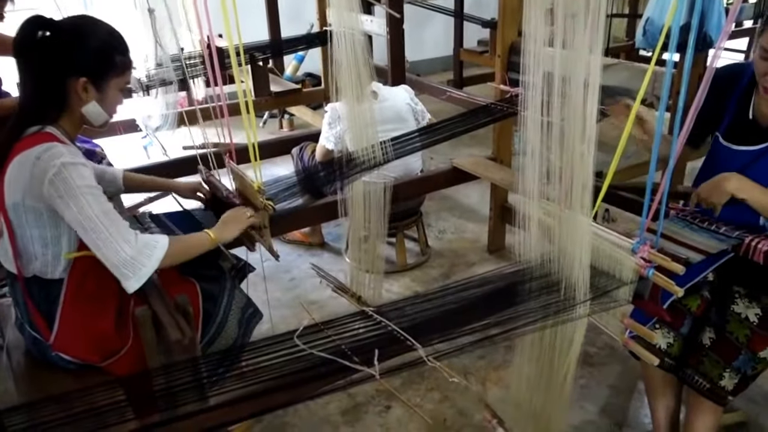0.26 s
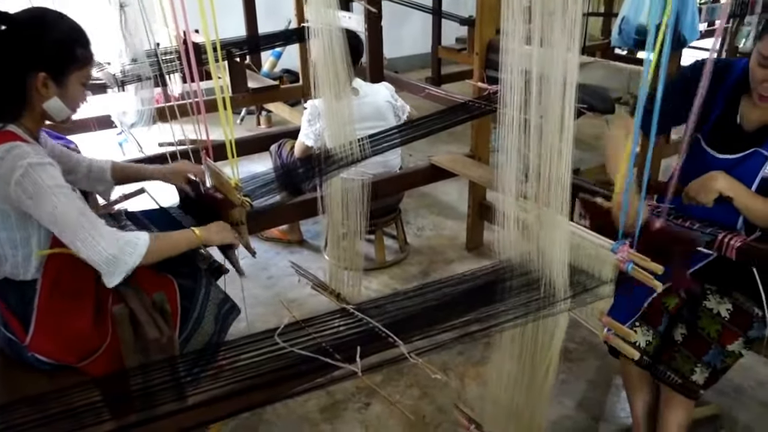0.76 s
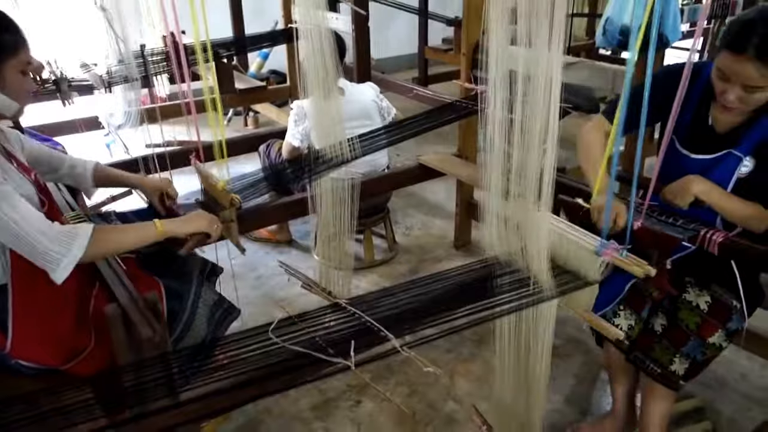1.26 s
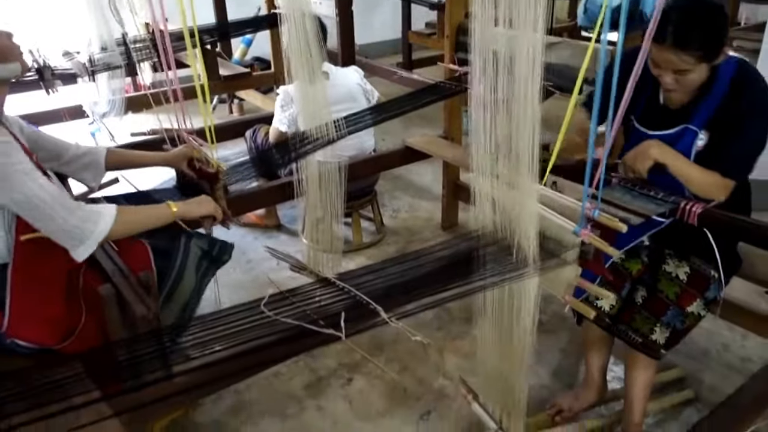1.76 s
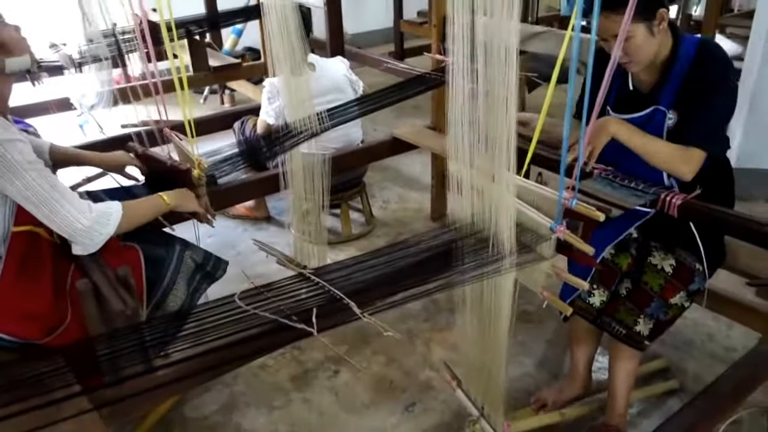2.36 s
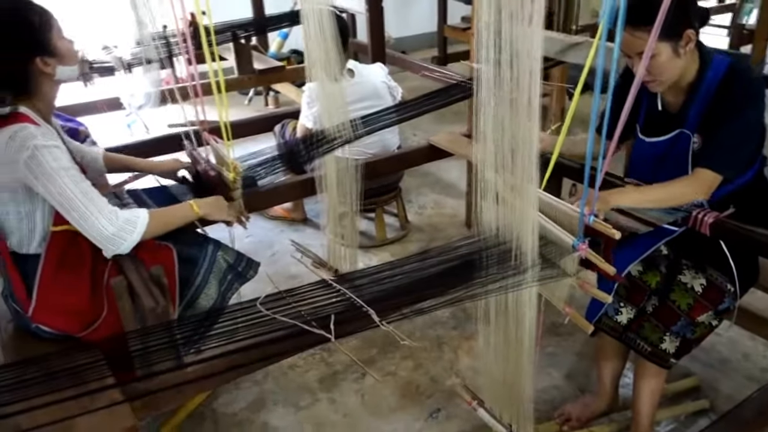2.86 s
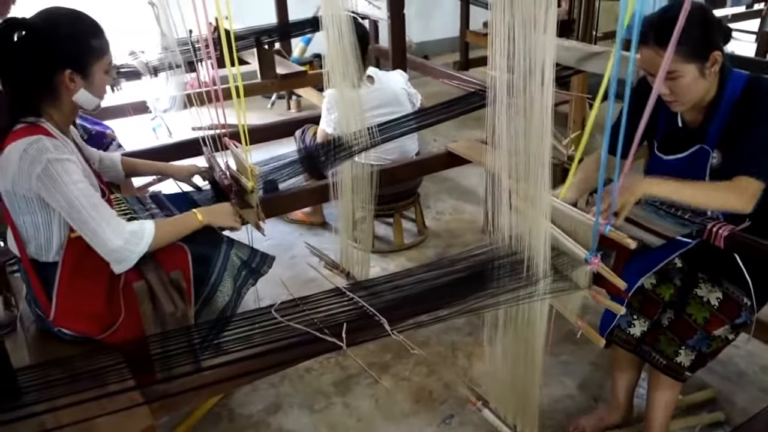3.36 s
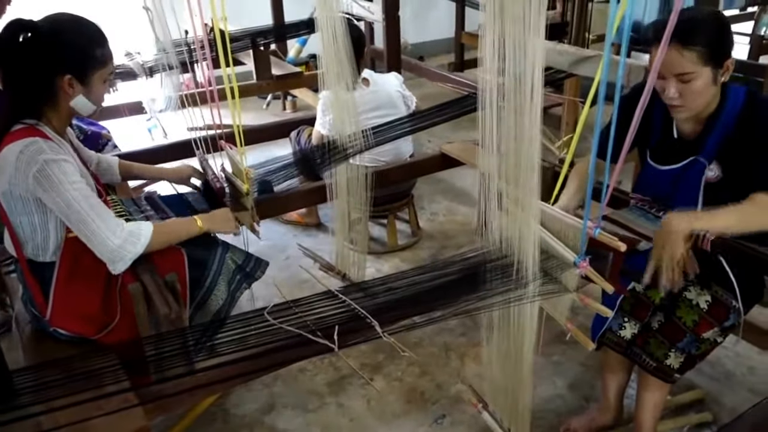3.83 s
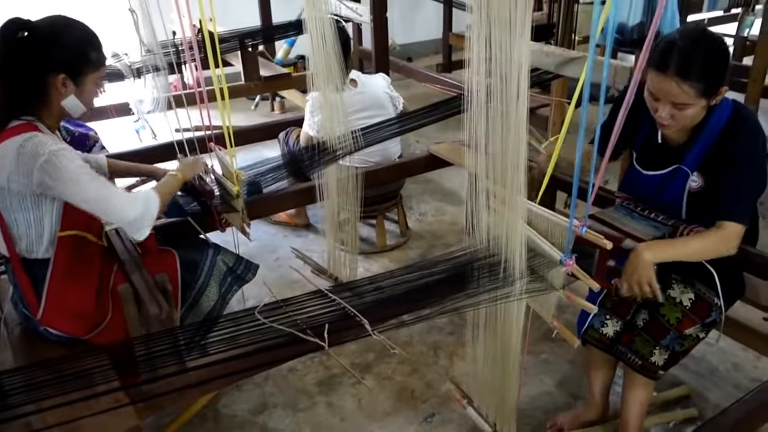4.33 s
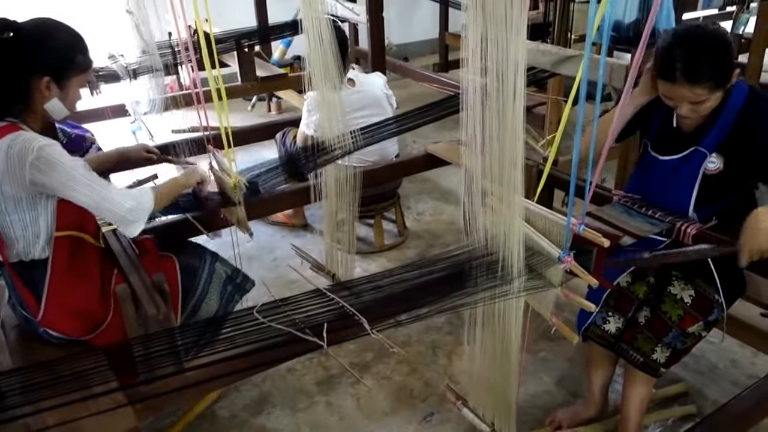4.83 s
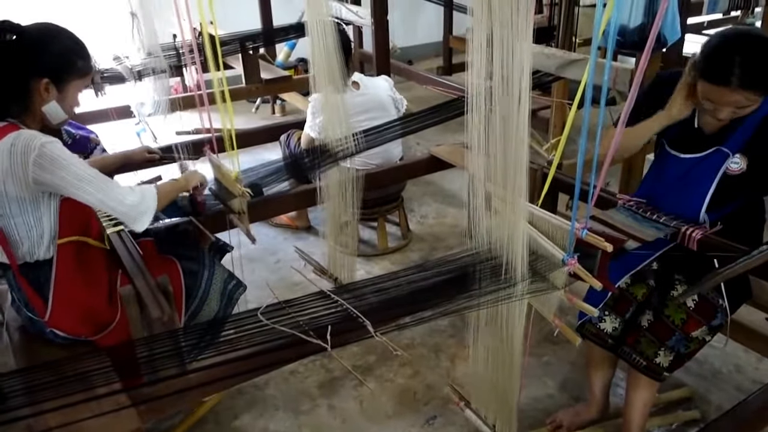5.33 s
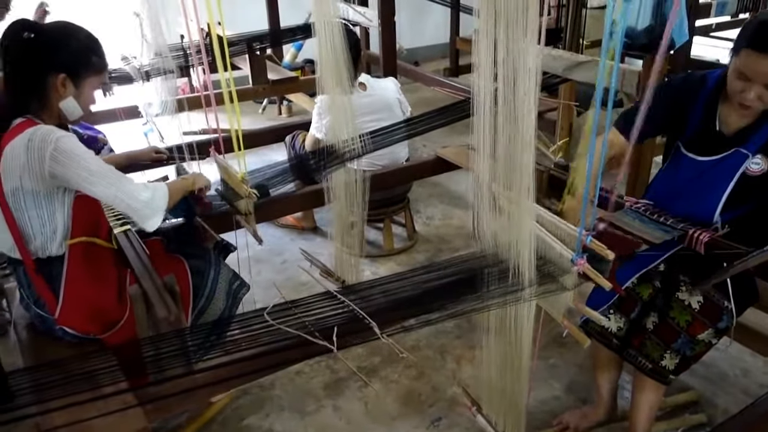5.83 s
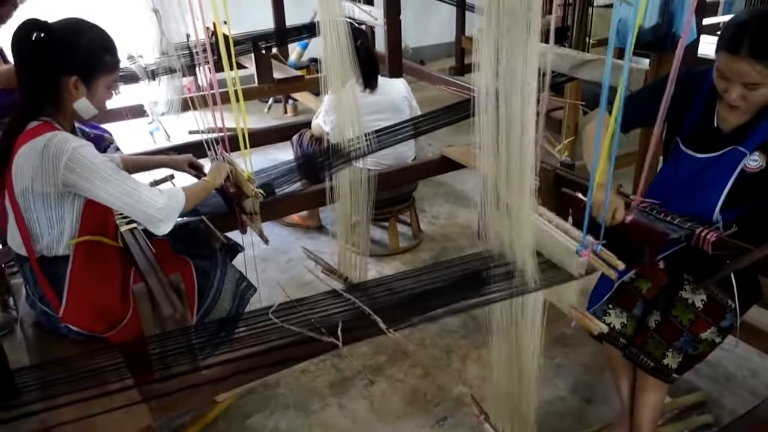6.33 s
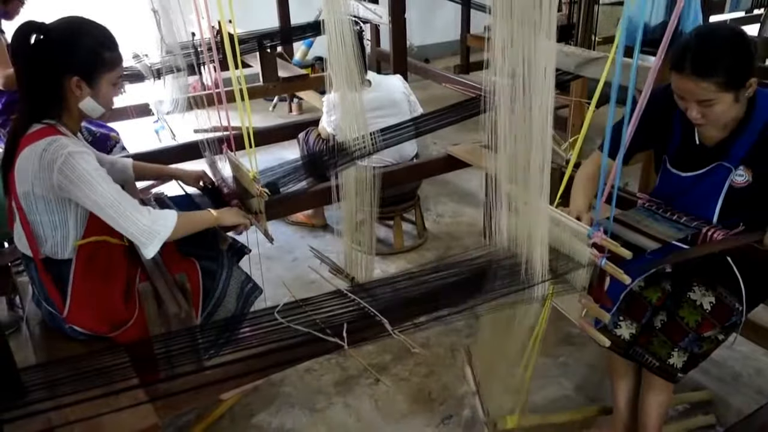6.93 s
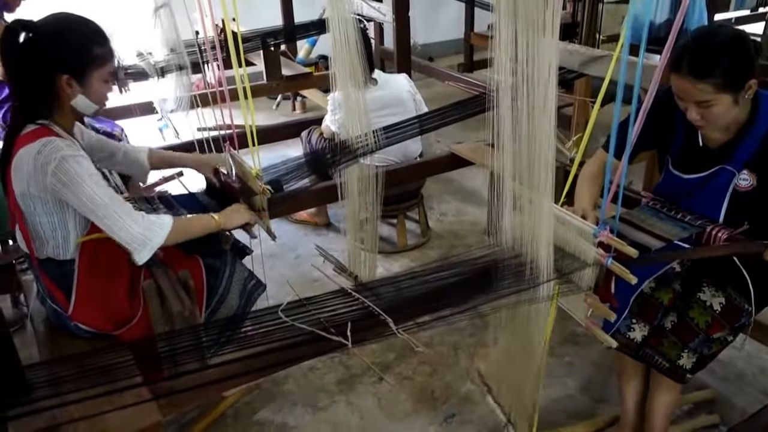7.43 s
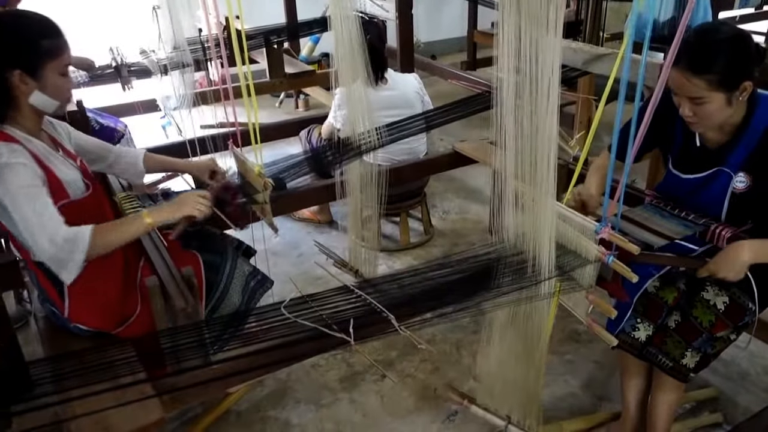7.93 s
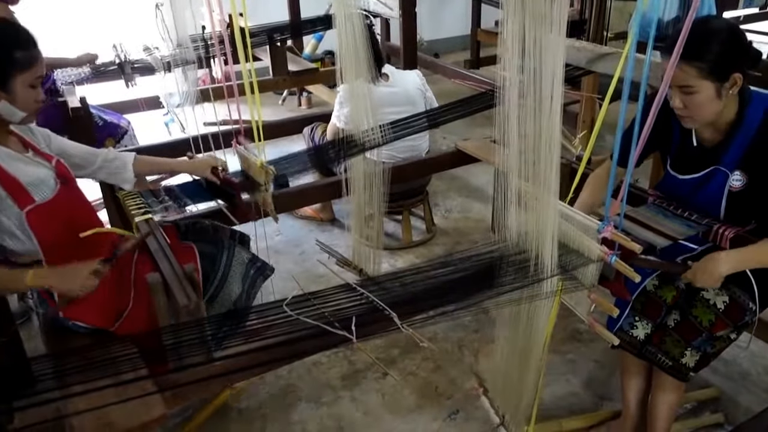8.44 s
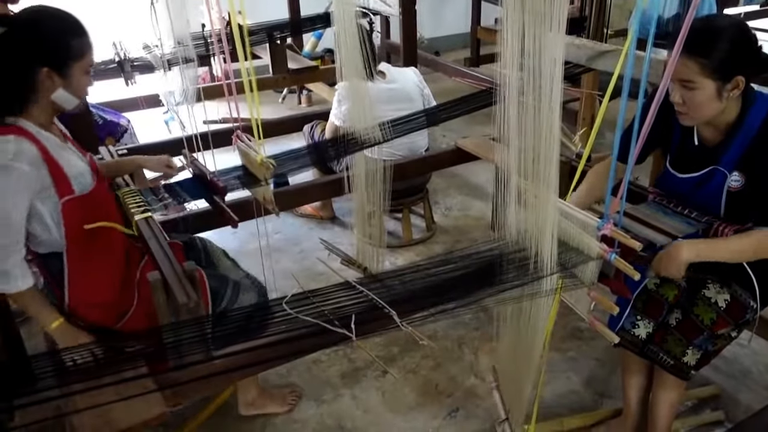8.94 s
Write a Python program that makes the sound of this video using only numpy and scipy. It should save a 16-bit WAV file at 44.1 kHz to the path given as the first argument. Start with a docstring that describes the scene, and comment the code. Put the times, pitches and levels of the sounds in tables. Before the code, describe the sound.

Several handlooms at work in a large reverberant hall, heard close in stereo. Light clacks and a soft treadle thump lead to two hard wooden beats, then quieter handling and thread rustle. Midway comes a steady run of four beats, later two more, then a stick scraping over threads and a flat wooden blade set down with drier knocks. Fans hum and insects shrill throughout; distant looms knock faintly.

```python
"""Handlooms in a large, hard-walled weaving hall: wires clack as the reed beats, then the batten knocks the frame.
Shuttles and sticks clack, treadles thump, a weaving sword is set down and warp threads rustle near the microphones.
Far looms arrive only off the walls; insects shrill outside over the drone of fans.
Blows are contact noise, ringing modes and hall reflections; steady sounds are shaped noise, insect calls thin tones.
Automatic gain dips when the sound is loud and creeps back up."""
import sys
import numpy as np
from scipy import signal
from scipy.fft import rfft, irfft, next_fast_len
from scipy.io import wavfile
from scipy.ndimage import uniform_filter1d, map_coordinates

SR = 44100
rng = np.random.default_rng(int(sys.argv[2]) if len(sys.argv) > 2 else 0)


def unload_wav(signal):
    """Save mono or channel-first audio to the path in sys.argv[1] as 16-bit WAV at rate SR, clipped to [-1, 1]."""
    wavfile.write(
        sys.argv[1],
        SR,
        np.round(np.clip(np.atleast_2d(signal).T, -1, 1) * 32767).astype(np.int16),
    )


N = 405279  # samples

# Event levels are nominal, ahead of any trim in a source, the stereo balance and the automatic gain.
# Spectra give relative density_db [dB per Hz]; mode levels are relative too and vary from blow to blow.

# Whole hall, decay of its reflections: frequency_hz [Hz], t60_s [s]
HALL_DECAY = [(100, 1.73), (500, 1.19), (1200, 1.26), (3000, 0.83), (7000, 0.8), (15000, 0.48)]
# Diffuse sound at the two microphones: frequency_hz [Hz], left_right_correlation [-1 to 1]
MIC_CORRELATION = [(100, 1), (300, 0.98), (600, 0.92), (1200, 0.78), (2400, 0.63), (4700, 0.18), (8000, 0)]

# Fan air: frequency_hz [Hz], density_db [dB per Hz]
FAN_SPECTRUM = [(20, -12), (30, -14), (39, -9), (51, -7.5), (66, -14), (125, -3.5), (175, -9), (230, -1.5),
                (360, -5.5), (405, -2), (550, -8.5), (680, -1.5), (860, -7.5), (925, -2.5), (1080, -14),
                (1170, -11), (1260, -4.5), (1430, -3), (1540, -13), (1700, -12), (2200, -10.5), (2600, -24),
                (5500, -46.5), (15500, -32.5)]
# Fan drone in the hall's resonances: centre_hz [Hz], half_width_hz [Hz], level_db [dB]
FAN_DRONES = [(225.3, 9.9, -38), (269.5, 14, -36), (408, 16, -45.5), (470, 26, -35.5)]
FANS_DB, FANS_DRIFT_DB, DRONE_DRIFT_DB = -28, 1, 0.8
# the highest drone swells once; the gain is what it adds, relative to the drone
SWELL_S, SWELL_HOLD_S, SWELL_ATTACK_S, SWELL_T60_S, SWELL_GAIN = 7.2, 0.19, 0.063, 0.24, 1.7

# Insect chorus outside: frequency_hz [Hz], density_db [dB per Hz]
CHORUS_SPECTRUM = [(4000, -27.5), (4470, -15), (4600, 3), (4740, 7.5), (4860, 5), (4960, -7), (5100, -22.5),
                   (5400, -84)]
# Level of the chorus: time_s [s], level_db [dB]
CHORUS_LEVEL = [(0, -19), (.8, -19), (2.2, -19.5), (3.1, -20), (4.0, -19), (4.8, -18.5), (5.4, -18.5),
                (6.3, -21), (7.6, -20.5), (8.2, -24), (9.19, -20)]
# Bouts of single insects, a little lower: start_s [s], hold_s [s], pitch_hz [Hz], level_db [dB]
INSECT_CALLS = [(3.8, 1.14, 4520, -34), (6.35, 0.27, 4530, -25), (6.4, 0.32, 4600, -30.5),
                (7.2, .55, 4594, -26), (7.25, 0.6, 4490, -39), (8.1, .3, 4620, -27),
                (8.15, 0.33, 4550, -31), (8.85, .3, 4600, -40), (8.92, .27, 4500, -27)]
CALL_WANDER_HZ, CALL_ATTACK_S, CALL_T60_S = 8.2, 0.051, 0.31

# Rustling warp threads: frequency_hz [Hz], density_db [dB per Hz]
WARP_SPECTRUM = [(800, 0), (2000, 14.5), (3200, 8), (5600, -10), (7300, -0.5), (9000, 0), (15500, -3.5)]
# A hand, the shed or the reed sweeps through the warp: full_strength_s [s], hold_s [s], level_db [dB]
WARP_BRUSHES = [(0.608, 0.034, -37), (0.86, 0.063, -38), (1.703, 0.12, -28.5), (2.974, 0.68, -47),
                (4.066, 0.11, -43), (4.657, 0.061, -36), (4.923, 0.057, -33), (5.29, 0.1, -20.5),
                (5.534, 0.047, -18), (5.818, .02, -28), (6.74, 0.16, -36), (7.217, 0.2, -51),
                (8.547, 0.076, -23)]
BRUSH_ATTACK_S, BRUSH_T60_S = 0.16, 0.34
WARP_REST_DB, WARP_DRIFT_DB = -40.5, 4  # the threads are never quite still

# Fingers pick threads free: start_s [s], length_s [s], level_db [dB]
PICKINGS = [(.15, 0.13, -35), (0.599, 0.11, -33), (2.101, 0.29, -31), (4.023, 0.21, -32.5),
            (6.787, .17, -37), (7.169, .27, -31)]
# One thread's snap: frequency_hz [Hz], density_db [dB per Hz]
SNAP_SPECTRUM = [(1200, -11), (2300, -16), (2600, -7), (2820, 13.5), (3020, -5), (3220, 9), (3520, -7),
                 (3800, 12), (4050, -12), (4350, -18), (5500, -16), (7500, -10), (10000, -19), (15000, -22)]
SNAPS_PER_S, SNAP_SPREAD_DB, SNAP_HALL_DB = 45, 3, -0.5

# Short wooden clacks: sticks, shuttles, and at 1.168 s the bright second contact after the first beat:
# start_s [s], wood_db [dB], click_db [dB]
WOOD_CLACKS = [(.16, -34, -31), (.245, -45, -33), (.603, -34, -38), (1.005, -29.5, -37), (1.168, -10, -38),
               (1.229, -8.5, -34), (1.613, -17, -27), (1.658, -15.5, -30), (2.137, -28, -32.5),
               (2.366, -34, -34.5), (2.714, -30.5, -47), (2.907, -32.5, -61), (2.983, -48, -53),
               (3.112, -17.5, -19), (3.291, -41, -41), (3.603, -31.5, -64), (4.078, -30.5, -37),
               (4.157, -29.5, -48), (4.294, -29.5, -58), (6.081, -18, -28.5), (6.564, -29, -36),
               (6.787, -25, -48), (6.82, -30, -42.5), (7.169, -25.5, -36), (7.341, -39, -38),
               (7.408, -34, -28), (8.492, -28, -34), (8.521, -22.5, -37), (8.552, -14, -26.5),
               (8.738, -15, -50), (8.827, -22, -25.5), (8.839, -23, -40)]
# Contact noise of light wood: frequency_hz [Hz], density_db [dB per Hz]
TAP_SPECTRUM = [(150, -42), (500, 2), (900, 4.5), (1150, 2), (1500, 0.5), (2300, 8), (2900, 3.5),
                (3400, -2.5), (4200, 3), (6000, -48), (12000, -44)]
# Modes of slats and sticks: frequency_hz [Hz], level_db [dB], t60_s [s]
SLAT_MODES = [(1614, 3.5, 0.024), (2284, 5.5, 0.059), (2820, 4, 0.038), (3500, -18, .025),
              (3800, -20, 0.027)]
TAP_HALL_DB, TAP_CRACK_DB = 2, -6.5  # crack relative to the clack's wood level
TICKS_PER_S, TICK_DB = 1.5, -49  # faintest level of the heddle ticks

# Taut threads slip over wood: start_s [s], pitch_hz [Hz], level_db [dB], t60_s [s]
THREAD_SQUEAKS = [(.244, 7160, -34, .06), (2.137, 7900, -32, 0.039), (4.03, 7160, -41, 0.14),
                  (4.075, 7300, -37, 0.24), (4.14, 7400, -42, .15), (7.189, 7900, -31, .035),
                  (7.211, 9000, -34, .04), (7.326, 7860, -33.5, .035)]
SQUEAK_WIDTH, SQUEAK_HALL_DB = 0.069, -5  # half-width as a fraction of the pitch

# A loose shed rod is nudged: start_s [s], level_db [dB]
ROD_HITS = [(.603, -25.5), (0.655, -28.5), (1.168, -13), (3.112, -26), (8.066, -26), (8.737, -22.5),
            (9.015, -27)]
# Modes of the rod: frequency_hz [Hz], level_db [dB], t60_s [s]
ROD_MODES = [(2778, -4, 0.21), (2876, 1, 0.11), (4220, -7, .07)]

# Treadles pushed down: start_s [s], level_db [dB], lowest_hz [Hz]
TREADLES = [(.861, -16.5, 62), (.944, -22, 62), (1.113, -13.5, 55.4), (1.224, -13, 90), (6.025, -23.5, 50),
            (6.2, -28, 35), (6.385, -27.5, 35)]
# Treadle thump: frequency_hz [Hz], density_db [dB per Hz]
TREADLE_SPECTRUM = [(28, -11), (50, 11), (66, -20), (88, 3.5), (125, 3.5), (180, -13), (300, -3),
                    (700, -10.5), (1500, -22), (3000, -35)]

# Beats: the reed meets the cloth, then the batten lands; where it lands decides which beams sing on.
# A second knock follows after about 33 to 62 ms, probably thrown back by a wall.
# start_s [s], reed_slat_db [dB], reed_wire_db [dB], landing_lag_s [s], landing_rise_s [s], knock_db [dB],
# bass_db [dB re knock], brightness_db [dB re knock], second_lag_s [s], second_db [dB re knock],
# low_beam_hz [Hz], low_beam_db [dB re knock_db], high_beam_hz [Hz], high_beam_db [dB re knock_db]
BEATS = [(1.099, -12.5, -13.5, .022, 0.0081, -3.5, -10.5, -5, 0.054, -8, 758, -3.5, 1260, -15),
         (1.333, -29, -14.5, 0.03, .002, -2.5, -19.5, -8, .054, 0, 793, -4.5, 1270, -13),
         (4.962, -15.5, -17.5, 0.038, 0.0069, -4.5, -13, -5.5, 0.059, -8.5, 586, -7, 1090, -7),
         (5.225, -22, -11, .03, 0.0043, -7, -11.5, -5, 0.062, -5.5, 606, -2.5, 1165, -4),
         (5.483, -29, -14, 0.033, 0.0083, -12.5, -9, -7.5, 0.033, -5, 576, -3, 1200, -4),
         (5.757, -18.5, -15, .034, .0015, -10, -12, -10, .057, -3.5, 580, -3.5, 1278, -0.5),
         (7.818, -20, -23, .029, 0.002, -9, -10.5, -11, .054, -24, 490, -11, 1280, -8),
         (8.066, -20, -21, 0.029, 0.009, -9, -10, -10, 0.049, -1.5, 790, -4.5, 1260, 0.5)]
# Contact noise of the reed's slats: frequency_hz [Hz], density_db [dB per Hz]
SLAT_SPECTRUM = [(700, -5), (1400, 1), (2400, 4), (3200, 3.5), (4200, -7), (6000, -12), (12000, -63)]
# Contact noise of the reed's wires: frequency_hz [Hz], density_db [dB per Hz]
WIRE_SPECTRUM = [(1500, -22), (3500, 4), (5600, 1.5), (7200, 2.5), (8500, -4), (11000, -4.5), (15500, -7.5)]
# Modes of the loom frame: frequency_hz [Hz], level_db [dB], t60_s [s]
FRAME_MODES = [(297, -8.5, 0.07), (489, 0.5, 0.035), (614, -0.5, 0.039), (791, 4, 0.047), (990, -8, 0.065),
               (1150, -0.5, 0.057), (1296, -3, 0.068)]
# Contact noise of the frame: frequency_hz [Hz], density_db [dB per Hz]
KNOCK_SPECTRUM = [(100, -33), (220, -6), (400, -1), (800, 4), (1020, -2.5), (1300, 4.5), (1550, -5),
                  (2000, -8.5), (3000, -58)]
# Low thud of the frame: frequency_hz [Hz], density_db [dB per Hz]
THUD_SPECTRUM = [(45, -48), (85, -24), (108, 1.5), (128, -1.5), (190, -4), (300, -2.5), (700, -6.5),
                 (2000, -50)]
BEAT_LOWEST_HZ, BEAT_HALL_DB, REED_HALL_DB = 200, 5.5, 5
BEAT_T60_S = 0.074  # the cloth damps the knock
SKEW_S, SKEW_DB = 0.011, -2.5  # the batten lands askew, one end after the other
SECOND_HALL_DB = 0.5  # diffuse hall sound after the second knock
BEAM_WIDTH_HZ, BEAM_RISE_S, BEAM_T60_S, BEAM_HALL_DB = 48, 0.0045, 0.17, 2.5

# Looms at the far end of the hall: start_s [s], level_db [dB]
FAR_KNOCKS = [(1.695, -6), (1.752, -10), (4.56, -16.5), (4.638, -12.5), (4.727, -14), (9.148, -9.5)]
# Modes of the distant frames: frequency_hz [Hz], level_db [dB], t60_s [s]
FAR_FRAME_MODES = [(493, -25, 0.091), (674, 5, 0.056), (758, 8, 0.083), (843, 8.5, 0.076),
                   (938, 4.5, 0.052), (1286, -3, 0.13)]

# A flat stick drawn across the warp in one stroke: time_s [s], level_db [dB]
SCRAPE_LEVEL = [(8.46, -43), (8.5, -24), (8.55, -29), (8.6, -29), (8.66, -31), (8.73, -27), (8.8, -42.5),
                (8.9, -40)]
# The stick rubbing on threads: frequency_hz [Hz], density_db [dB per Hz]
STICK_SPECTRUM = [(400, -28), (800, -13), (1500, 4), (2300, -5), (3000, -23), (4000, -11), (6000, -12),
                  (12000, -34), (15500, -19)]
PLUCKS_PER_S, PLUCK_SPREAD_DB, PLUCK_T60_S, SCRAPE_HALL_DB = 80, 5, 0.025, 3

# Weaving sword set down on the frame, too light to shake the big beams:
# start_s [s], level_db [dB], lowest_beam_hz [Hz], blade_hz [Hz], blade_db [dB re level_db]
SWORD_KNOCKS = [(8.814, -12.5, 805, 882, -6), (9.015, -10, 520, 990, 0)]
SWORD_BASS_DB, SWORD_BRIGHT_DB, SWORD_HALL_DB = -37, -9.5, 4
SWORD_RISE_S, SWORD_T60_S, SWORD_TOP_HZ = 0.00035, 0.11, 3020

TOP_HZ = 15950  # upper band limit of the output
HIT_T = np.arange(SR // 4) / SR  # time axis of one hit, s
ONSET = round(0.014 * SR)  # samples that set a hit's level


def amp(db):
    """Decibels to gain."""
    return 10 ** (np.asarray(db) / 20)


def unit(x):
    """Scale to rms 1."""
    return x / np.sqrt(np.mean(x ** 2) + 1e-20)


def along(points, hz):
    """Read (Hz, value) points on a log frequency axis."""
    f, v = np.transpose(points)
    return np.interp(np.log(hz + 1), np.log(f + 1), v)


def curve(rows):
    """One value per sample from (s, value) rows."""
    return np.interp(np.arange(N) / SR, *np.transpose(rows))


def wobble(rate):
    """A smooth random curve, rate knots a second."""
    knots = rng.standard_normal(int(N * rate / SR) + 4)
    return map_coordinates(knots, [np.arange(N) * rate / SR])


def diffuse(gain, size):
    """Stereo noise of rms 1 from all around, coloured by gain(Hz): alike in the bass, unrelated in the treble."""
    m = next_fast_len(size)
    hz = np.fft.rfftfreq(m, 1 / SR)
    turn = np.arccos(np.clip(along(MIC_CORRELATION, hz), -1, 1)) / 2
    spectra = rfft(rng.standard_normal((2, m))) * gain(hz)
    mid, side = irfft(spectra * [np.cos(turn), np.sin(turn)], m)[:, :size]
    return unit(np.array([mid + side, mid - side]))


def noise(spectrum, size=N):
    """Diffuse noise with a spectrum of (Hz, dB) points."""
    return diffuse(lambda hz: amp(along(spectrum, hz)), size)


def struck(x):
    """Scale a hit so that its onset has rms 1."""
    return x / np.sqrt(np.mean(x[..., :ONSET] ** 2) + 1e-20)


def burst(spectrum, t60, rise=0.000074):
    """Contact noise that rises over about rise seconds and dies away."""
    envelope = amp(-60 * HIT_T / t60) * (1 - np.exp(-HIT_T / rise))
    return struck(noise(spectrum, len(HIT_T)) * envelope)


def ring(modes, detune):
    """Decaying modes; each blow lands elsewhere and excites them a little differently."""
    hz, db, t60 = np.transpose(modes)[:, :, None]
    pitch, strength, phase = rng.standard_normal((3, len(modes), 1))
    waves = np.sin(2 * np.pi * (hz * (1 + detune * pitch) * HIT_T + phase))
    decays = amp(db + 3.2 * strength - 60 * HIT_T / t60)
    return struck(np.sum(waves * decays, axis=0) * (1 - np.exp(-HIT_T / 0.00033)))


def hall_tail(gain, build):
    """Reflections coloured by gain(Hz): they thicken over build seconds, and the treble dies first."""
    hz, t, z = signal.stft(diffuse(gain, SR), SR, nperseg=256)
    decay = amp(-60 * t / along(HALL_DECAY, hz)[:, None])
    return signal.istft(z * decay * (1 - np.exp(-t / build)), SR, nperseg=256)[1]


def echo(hit, build):
    """The hall's answer, with the energy of the hit."""
    wet = signal.fftconvolve(hit[:1], hall_tail(np.ones_like, build), axes=1)
    return wet * np.linalg.norm(hit) / np.linalg.norm(wet)


def radiate(strike, count, build):
    """The frame sends a different mix of its modes towards each wall, so the hall's answer is broad."""
    return sum(echo(strike(), build) for _ in range(count)) / np.sqrt(count)


def add(out, s, sound):
    """Mix a sound in at time s."""
    part = out[:, max(round(s * SR), 0):][:, :sound.shape[-1]]
    part += sound[..., :part.shape[1]]


def stroke(s, hold_s, attack_s, t60):
    """Envelope of one movement: full strength at time s, held, then dying away."""
    t = np.arange(N) / SR - s
    return np.clip(1 + t / attack_s, 0, 1) ** 2 * amp(-60 * np.maximum(t - hold_s, 0) / t60)


def fans():
    """Moving air is a wash of noise, with a few narrow drones that drift in level."""
    air = amp(FANS_DB + FANS_DRIFT_DB * wobble(5)) * noise(FAN_SPECTRUM)
    drones = []
    for centre_hz, half_width_hz, db in FAN_DRONES:
        band = diffuse(lambda hz: 1 / (1 + ((hz - centre_hz) / half_width_hz) ** 2), N)
        drones.append(amp(db + DRONE_DRIFT_DB * wobble(1.5)) * band)
    swell = SWELL_GAIN * stroke(SWELL_S, SWELL_HOLD_S, SWELL_ATTACK_S, SWELL_T60_S)
    return air + sum(drones) + swell * drones[-1]


def insects():
    """Many insects merge into a finely fluttering band; a few stand out below its peak as thin whistles."""
    waver_db = 0.3 * wobble(9)
    out = amp(curve(CHORUS_LEVEL) + waver_db) * noise(CHORUS_SPECTRUM)
    t = np.arange(2 * SR) / SR
    knots = np.linspace(0, 2, 60)
    for s, hold_s, pitch_hz, db in INSECT_CALLS:
        hz = pitch_hz + CALL_WANDER_HZ * np.interp(t, knots, rng.standard_normal(len(knots)))
        cycles = np.cumsum(hz) / SR + rng.random((2, 1))  # each microphone gets its own phase
        whistle = unit(np.sin(2 * np.pi * cycles))
        attack = np.minimum(t / CALL_ATTACK_S, 1)
        add(out, s, whistle * attack * amp(db - 60 * np.maximum(t - hold_s, 0) / CALL_T60_S))
    return out


def warp():
    """Hundreds of threads catch and let go as the shed changes, in loose clumps."""
    motion = amp(WARP_REST_DB + WARP_DRIFT_DB * wobble(1.88))
    for s, hold_s, db in WARP_BRUSHES:
        motion = motion + amp(db) * stroke(s, hold_s, BRUSH_ATTACK_S, BRUSH_T60_S)
    clumps_db = 2 * wobble(18) + 2 * wobble(60) + 1.3 * wobble(470)
    return motion * unit(noise(WARP_SPECTRUM) * amp(clumps_db))


def heddles():
    """Heddle rods tick faintly at random moments."""
    out = np.zeros((2, N))
    for when, strength in rng.random((round(TICKS_PER_S * N / SR), 2)):
        wood = burst(TAP_SPECTRUM, t60=0.045, rise=0.0016)
        wire = amp(-5.5) * burst(WIRE_SPECTRUM, t60=0.062, rise=0.002)
        add(out, when * N / SR, amp(TICK_DB) * (1 + strength) * (wood + wire))
    return out


def picking():
    """Single threads snap free at an uneven rate, each with its own strength."""
    out = np.zeros((2, N))
    for s, length_s, db in PICKINGS:
        snaps = np.zeros((2, SR // 2))
        for when, strength in rng.random((round(SNAPS_PER_S * length_s), 2)):
            snap_db = db + SNAP_SPREAD_DB * (2 * strength - 2.5)  # always below the table's level
            add(snaps, when * length_s, amp(snap_db) * burst(SNAP_SPECTRUM, t60=0.029))
        add(out, s, snaps)
        add(out, s, amp(SNAP_HALL_DB) * echo(snaps, build=0.0039))
    return out


def wood_clacks():
    """Short wooden contacts: a very short ring with a click on top, then a diffuse answer from the walls."""
    out = np.zeros((2, N))
    for s, wood_db, click_db in WOOD_CLACKS:
        wood = amp(wood_db) * burst(TAP_SPECTRUM, t60=0.065, rise=0.00019)
        click = amp(click_db) * burst(WIRE_SPECTRUM, t60=0.062, rise=0.00028)
        contact = wood + click
        crack = amp(wood_db + TAP_CRACK_DB) * burst(TAP_SPECTRUM, t60=0.018)
        add(out, s, contact + crack + amp(wood_db - 7.5) * ring(SLAT_MODES, detune=0.023))
        add(out, s, amp(TAP_HALL_DB) * echo(contact, build=0.0065))
    return out


def squeaks():
    """A slipping thread sings briefly in a narrow, rough band."""
    out = np.zeros((2, N))
    for s, pitch_hz, db, t60 in THREAD_SQUEAKS:
        tone = diffuse(lambda hz: 1 / (1 + ((hz / pitch_hz - 1) / SQUEAK_WIDTH) ** 4), len(HIT_T))
        envelope = amp(-60 * HIT_T / t60) * (1 - np.exp(-HIT_T / 0.0025))
        hit = amp(db) * struck(tone * envelope)
        add(out, s, hit)
        add(out, s, amp(SQUEAK_HALL_DB) * echo(hit, build=0.011))
    return out


def rod():
    """A hard, lightly held rod gives a thin, clear note that lingers in the hall."""
    out = np.zeros((2, N))
    for s, db in ROD_HITS:
        hit = amp(db) * ring(ROD_MODES, detune=0.0044) * np.ones((2, 1))
        add(out, s, hit)
        add(out, s, amp(-2.0) * echo(hit, build=0.016))
    return out


def treadles():
    """A foot pushes a pole down and the harness thumps softly."""
    out = np.zeros((2, N))
    for s, db, lowest_hz in TREADLES:
        thump = burst(TREADLE_SPECTRUM, t60=0.25, rise=0.0017)
        highpass = signal.butter(4, lowest_hz, "high", fs=SR, output="sos")
        hit = amp(db) * signal.sosfilt(highpass, thump)
        add(out, s, hit)
        add(out, s, amp(-0.5) * echo(hit, build=0.015))
    return out


def clack(spectrum, t60, rise):
    """Many small contacts along the reed: a smeared burst, then a smooth wash from the walls."""
    hit = burst(spectrum, t60, rise)
    wet = hall_tail(lambda hz: amp(along(spectrum, hz)), build=0.02)
    out = wet * amp(REED_HALL_DB) * np.linalg.norm(hit) / np.linalg.norm(wet)
    add(out, 0, hit)
    return out


def reed():
    """The reed's many thin wires hit the weft not quite together: a bright, smeared clack."""
    out = np.zeros((2, N))
    for s, slat_db, wire_db, *_ in BEATS:
        add(out, s, amp(slat_db) * clack(SLAT_SPECTRUM, t60=0.14, rise=0.0012))
        add(out, s, amp(wire_db) * clack(WIRE_SPECTRUM, t60=0.099, rise=0.0028))
    return out


def knock(bass_db, bright_db, lowest_hz, rise, t60):
    """Wood lands on the frame: ringing beams, a low thud and rattling slats."""
    beams = amp(-4.5) * ring(FRAME_MODES, detune=0.024) + burst(KNOCK_SPECTRUM, t60)
    beams = signal.sosfilt(signal.butter(3, lowest_hz, "high", fs=SR, output="sos"), beams)
    beams = struck(beams * (1 - np.exp(-HIT_T / rise)))
    slats = struck(amp(6.0) * ring(SLAT_MODES, detune=0.011) + burst(SLAT_SPECTRUM, t60=0.65))
    thud = amp(bass_db) * burst(THUD_SPECTRUM, t60=0.19, rise=0.0026)
    return beams + amp(bright_db) * slats + thud


def rattle(strike, count, within, size_db):
    """Loose joints chatter: weaker contacts, each with its own ring, follow the first over about within seconds."""
    out = np.zeros((2, 2 * len(HIT_T)))
    add(out, 0, strike())
    for k, (slip, strength) in enumerate(rng.random((count, 2))):
        delay = (k + slip) / count  # fraction of within
        add(out, (0.1 + delay) * within, amp(size_db - 3.0 * delay) * strength * strike())
    return out


def singing(pitch_hz):
    """One beam or blade swells and rings on after the blow, as a narrow band of noise around its pitch."""
    cluster = diffuse(lambda hz: 1 / (1 + ((hz - pitch_hz) / BEAM_WIDTH_HZ) ** 4), len(HIT_T))
    envelope = amp(-60 * HIT_T / BEAM_T60_S) * (1 - np.exp(-HIT_T / BEAM_RISE_S))
    return unit(cluster * envelope) * np.sqrt(np.mean(envelope ** 2))


def beater():
    """The heavy batten knocks the frame just after the reed; a second knock follows, probably off a wall."""
    out = np.zeros((2, N))
    for (s, _, _, lag_s, rise, db, bass_db, bright_db, second_lag_s, second_db,
         low_hz, low_db, high_hz, high_db) in BEATS:
        landing_s = s + lag_s
        strike = lambda: amp(db - 3.0) * knock(bass_db, bright_db, BEAT_LOWEST_HZ, rise, BEAT_T60_S)
        beams = amp(db + low_db) * singing(low_hz) + amp(db + high_db) * singing(high_hz)
        second_knock = amp(second_db) * strike()
        add(out, landing_s, rattle(strike, count=3, within=0.14, size_db=-0.5))
        add(out, landing_s + SKEW_S, amp(SKEW_DB) * strike())
        add(out, landing_s, amp(BEAT_HALL_DB) * radiate(strike, count=2, build=0.025))
        add(out, landing_s + second_lag_s, second_knock)
        add(out, landing_s + second_lag_s, amp(SECOND_HALL_DB) * echo(second_knock, build=0.027))
        add(out, landing_s, beams)
        add(out, landing_s, amp(BEAM_HALL_DB) * echo(beams, build=0.012))
    return out


def far_looms():
    """Distant beaters reach the microphones only by way of the walls."""
    out = np.zeros((2, N))
    for s, db in FAR_KNOCKS:
        def strike():
            """One distant knock: frame modes with contact noise."""
            contact = amp(1.5) * burst(KNOCK_SPECTRUM, t60=0.032)
            return amp(db) * struck(ring(FAR_FRAME_MODES, detune=0.025) + contact)
        add(out, s, radiate(strike, count=2, build=0.0039))
    return out


def scrape():
    """The stick's edge plucks one thread after another, unevenly; the hall blurs the ticks."""
    times, levels_db = np.transpose(SCRAPE_LEVEL)
    length_s = times[-1] - times[0]
    count = round(PLUCKS_PER_S * length_s)
    ticks = np.zeros((2, SR // 2))
    for k, (slip, strength) in enumerate(rng.random((count, 2))):
        when = (k + slip) / count * length_s
        db = np.interp(times[0] + when, times, levels_db) + PLUCK_SPREAD_DB * (2 * strength - 1)
        add(ticks, when, amp(db) * burst(STICK_SPECTRUM, PLUCK_T60_S))
    out = np.zeros((2, N))
    add(out, times[0], ticks)
    add(out, times[0], amp(SCRAPE_HALL_DB) * echo(ticks, build=0.0081))
    return out


def sword():
    """The flat weaving sword knocks the same frame, with a higher, drier sound, and its blade rings briefly."""
    out = np.zeros((2, N))
    for s, db, lowest_hz, blade_hz, blade_db in SWORD_KNOCKS:
        strike = lambda: amp(db) * knock(SWORD_BASS_DB, SWORD_BRIGHT_DB, lowest_hz, SWORD_RISE_S, SWORD_T60_S)
        blade = amp(db + blade_db) * singing(blade_hz)
        add(out, s, rattle(strike, count=5, within=0.11, size_db=-7.0))
        add(out, s, amp(SWORD_HALL_DB) * radiate(strike, count=2, build=0.0095))
        add(out, s, blade)
        add(out, s, amp(BEAM_HALL_DB) * echo(blade, build=0.043))
    return signal.sosfilt(signal.butter(5, SWORD_TOP_HZ, fs=SR, output="sos"), out)


def scene():
    """Looms, handling and insects lean left in level; sound reaches the right microphone a sample sooner."""
    loom = beater() + reed() + sword() + far_looms()
    handling = wood_clacks() + rod() + picking() + heddles() + squeaks() + warp() + scrape()
    mix = treadles() + fans()
    mix = mix + loom * amp([[1.1], [-1.1]])
    mix = mix + handling * amp([[0.5], [-0.5]])
    mix = mix + insects() * amp([[0.35], [-0.35]])
    left, right = mix
    return np.array([np.roll(left, 1), right])


def gain_control(x, ceiling_db, recover_db, start_db, share):
    """Loud sound pulls the gain down at once by a share of its excess; it recovers by recover_db a second."""
    power = uniform_filter1d(np.mean(x ** 2, axis=0), size=1300)
    level_db = 10 * np.log10(np.abs(power) + 1e-12)
    excess = share * np.maximum(level_db - ceiling_db, 0)
    excess[0] = start_db  # the gain is already down at the start
    ramp = recover_db * np.arange(N) / SR
    cut_db = np.maximum.accumulate(excess + ramp) - ramp
    return x * amp(-uniform_filter1d(cut_db, size=200))


def record(dry):
    """Automatic gain rides the level, the highest peaks are rounded off and nothing above the band limit is kept."""
    x = gain_control(dry, ceiling_db=-14, recover_db=3.0, start_db=3.5, share=0.71)
    x = x / (1 + (x / 0.95) ** 8) ** (1 / 8)
    return irfft(rfft(x) * (np.fft.rfftfreq(N, 1 / SR) < TOP_HZ), N)


dry = scene()
out = record(dry)
unload_wav(out)
```